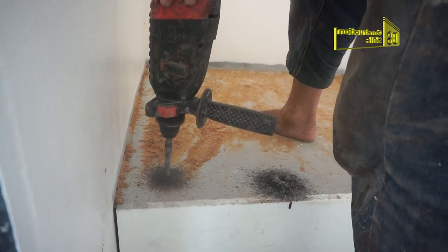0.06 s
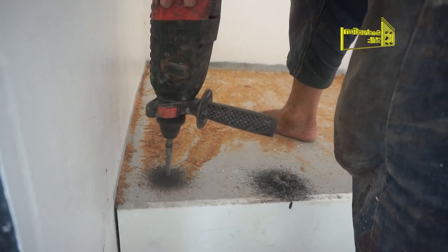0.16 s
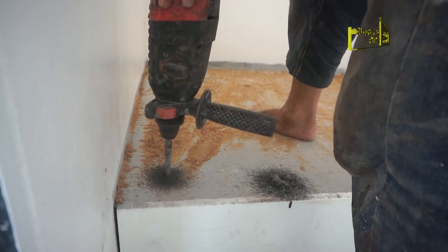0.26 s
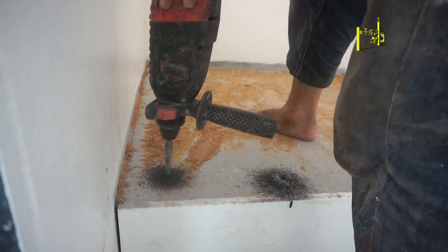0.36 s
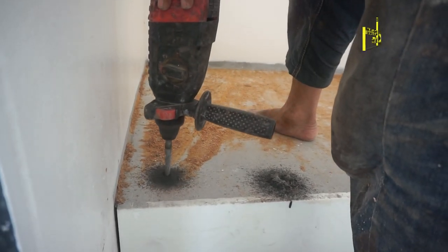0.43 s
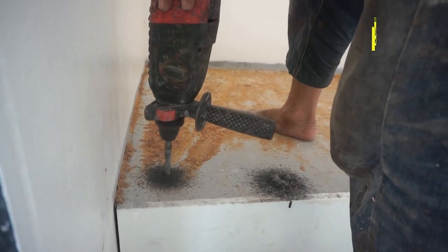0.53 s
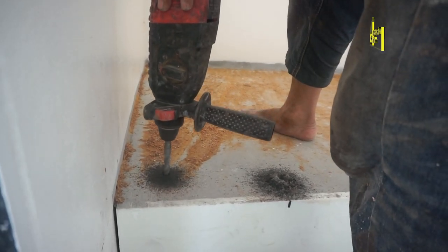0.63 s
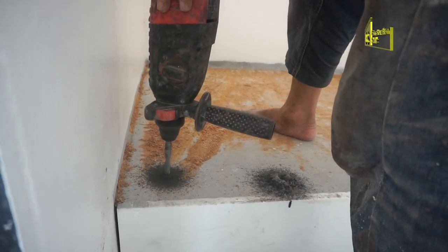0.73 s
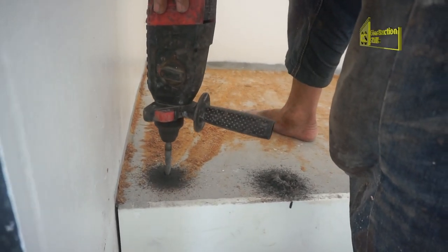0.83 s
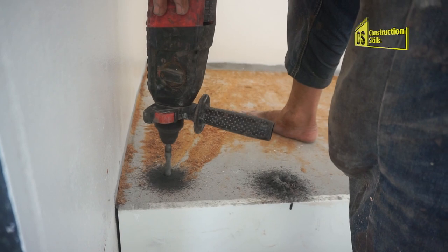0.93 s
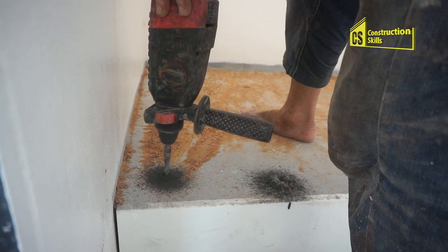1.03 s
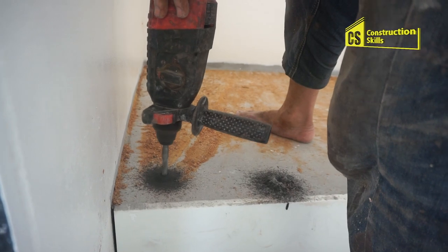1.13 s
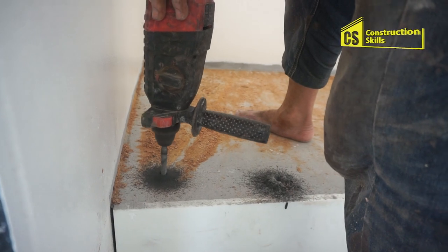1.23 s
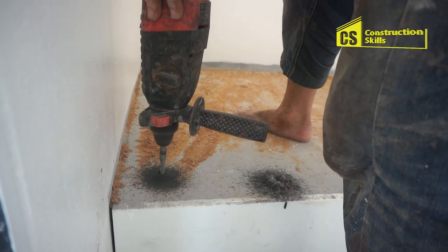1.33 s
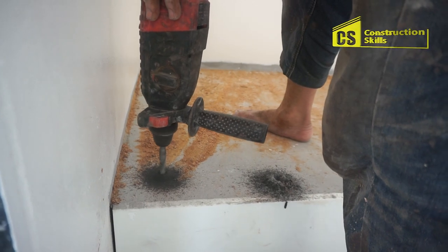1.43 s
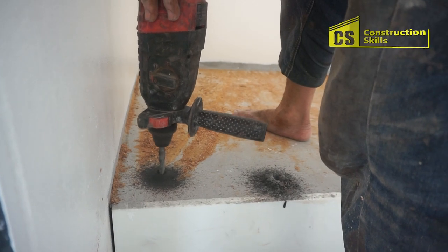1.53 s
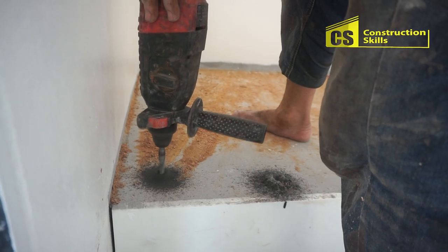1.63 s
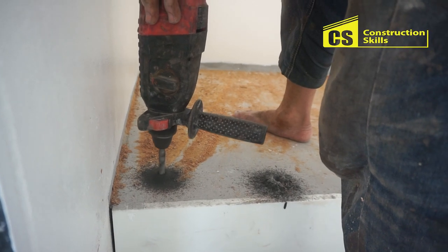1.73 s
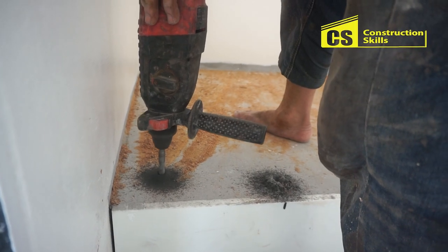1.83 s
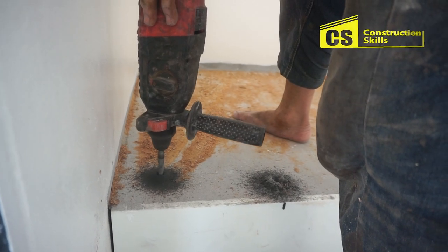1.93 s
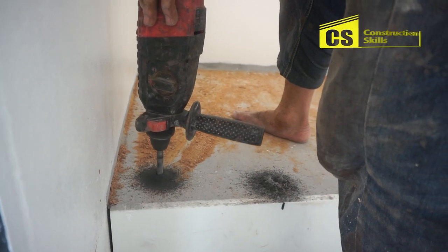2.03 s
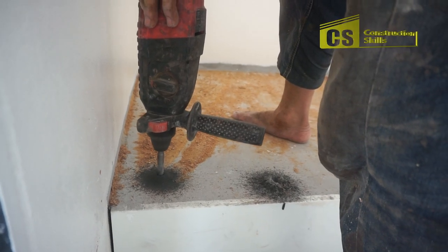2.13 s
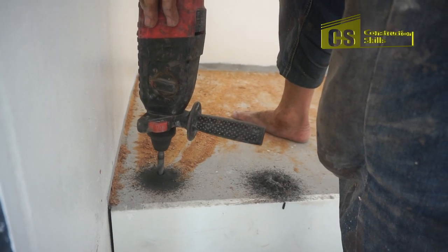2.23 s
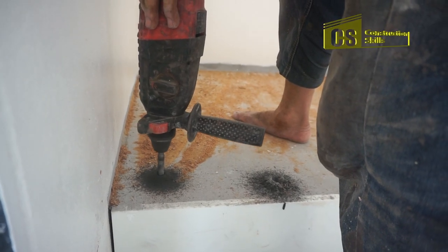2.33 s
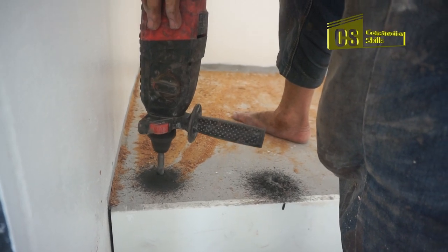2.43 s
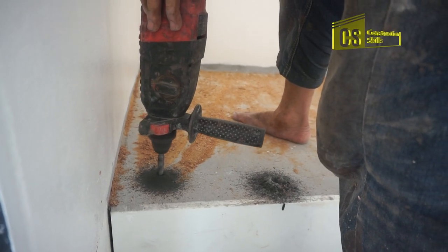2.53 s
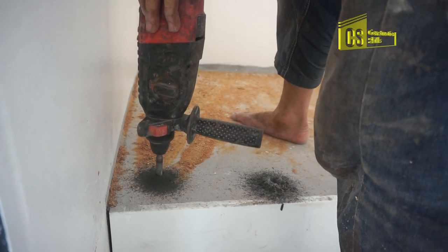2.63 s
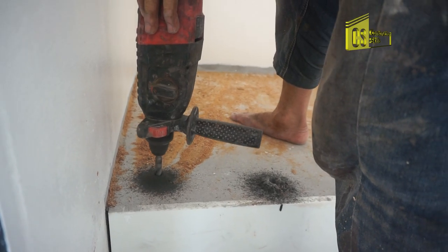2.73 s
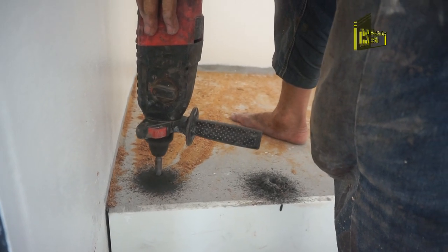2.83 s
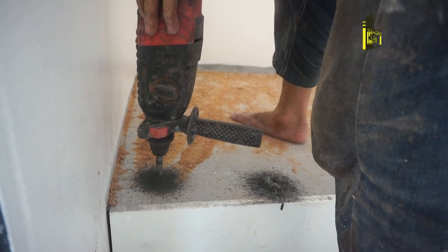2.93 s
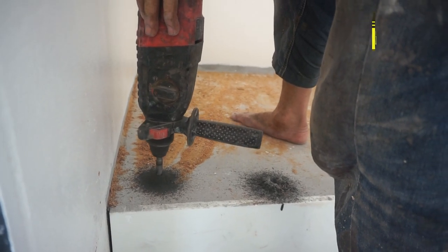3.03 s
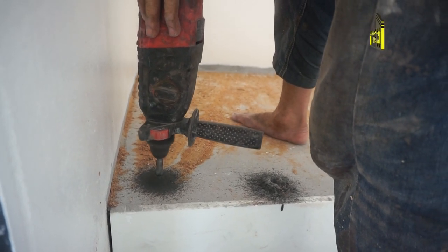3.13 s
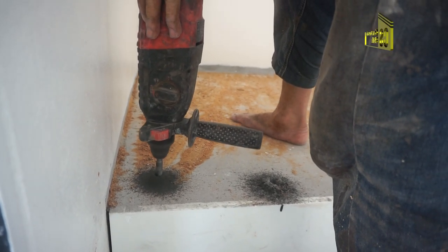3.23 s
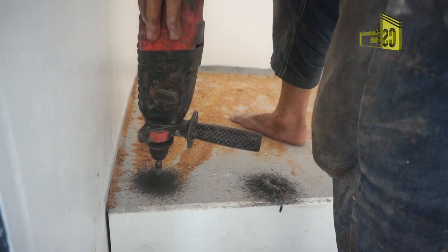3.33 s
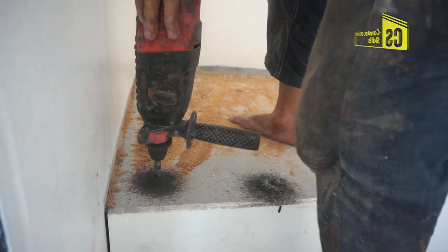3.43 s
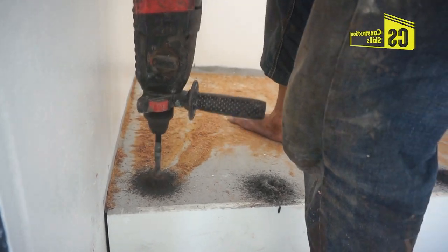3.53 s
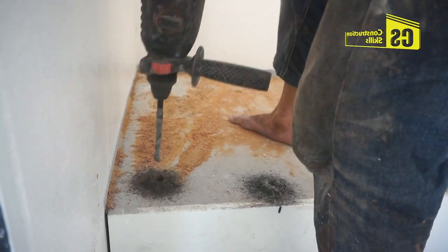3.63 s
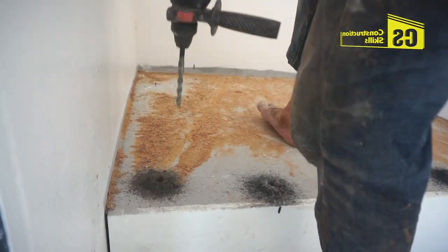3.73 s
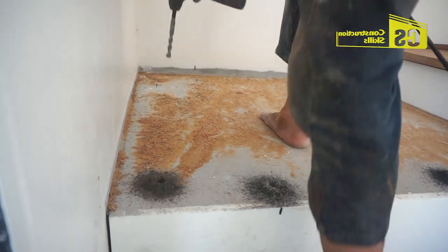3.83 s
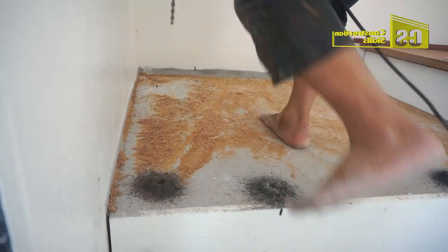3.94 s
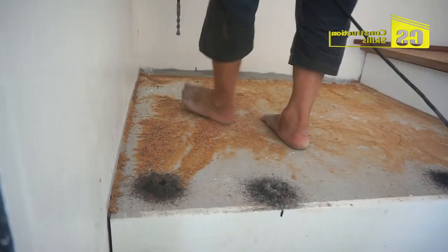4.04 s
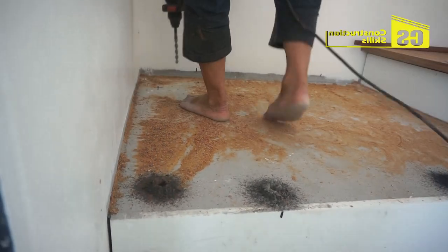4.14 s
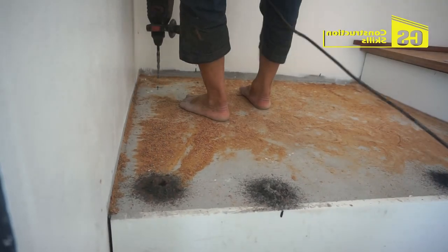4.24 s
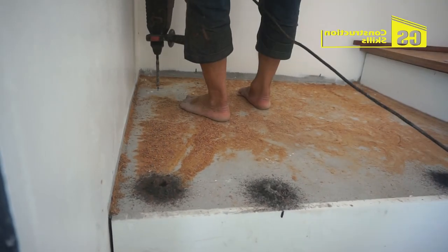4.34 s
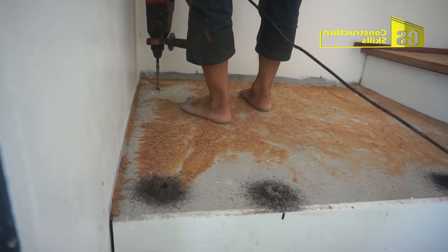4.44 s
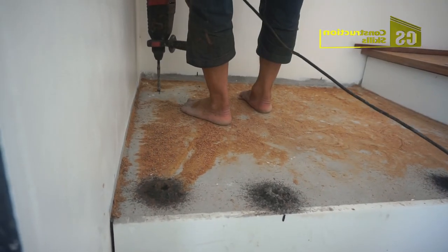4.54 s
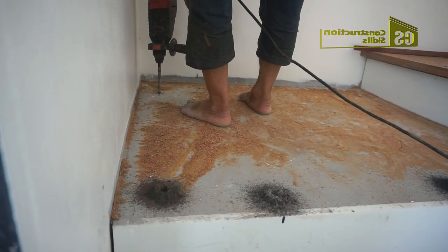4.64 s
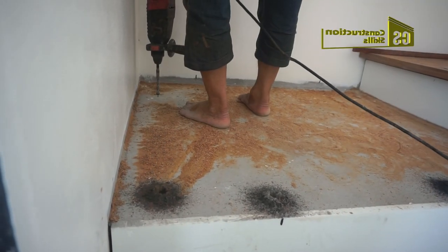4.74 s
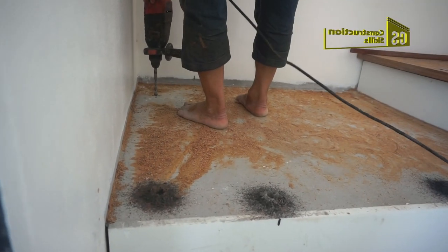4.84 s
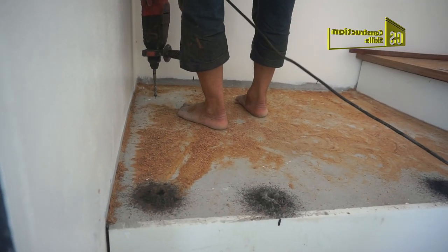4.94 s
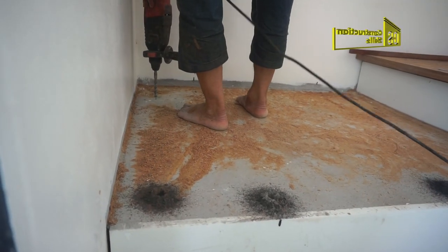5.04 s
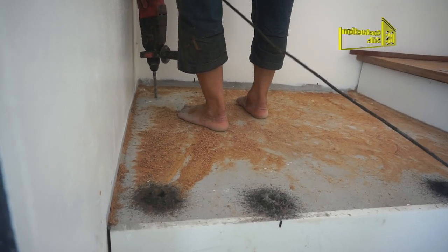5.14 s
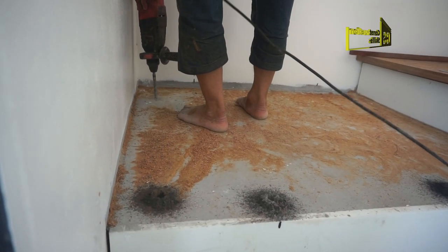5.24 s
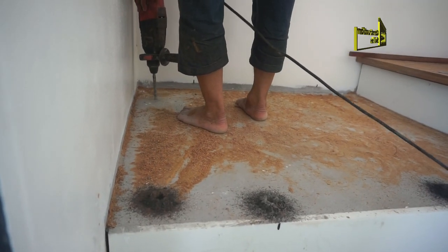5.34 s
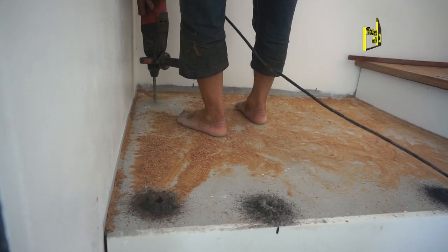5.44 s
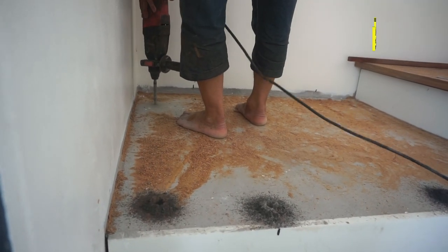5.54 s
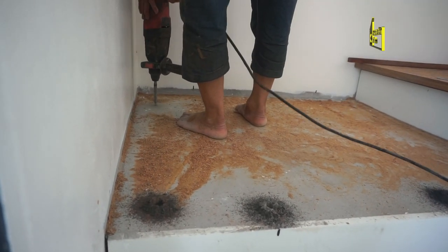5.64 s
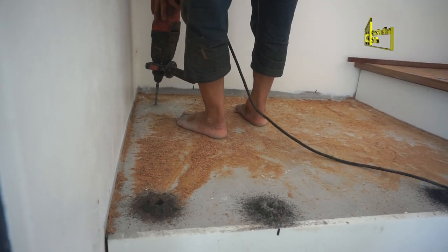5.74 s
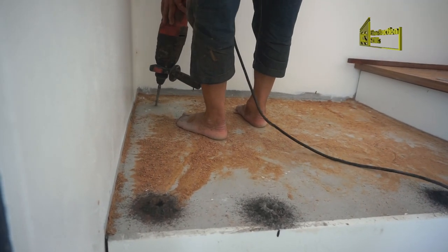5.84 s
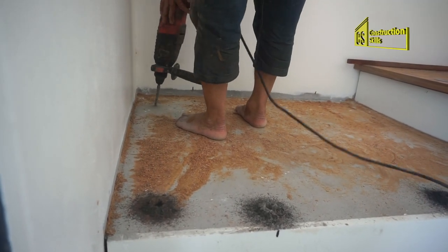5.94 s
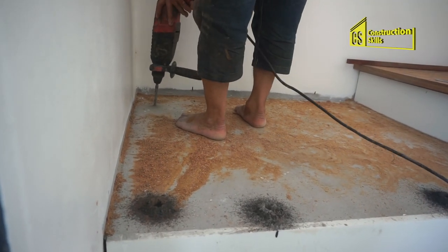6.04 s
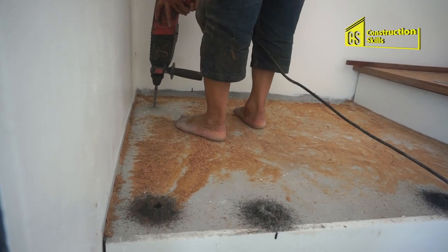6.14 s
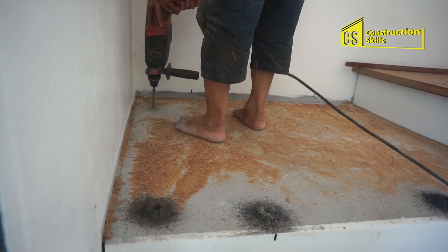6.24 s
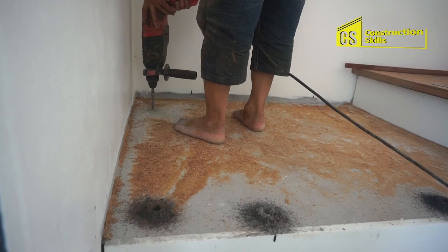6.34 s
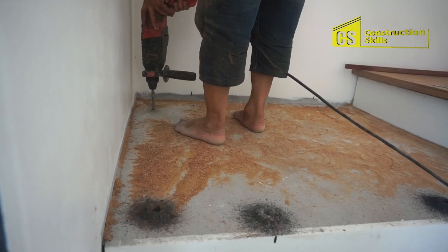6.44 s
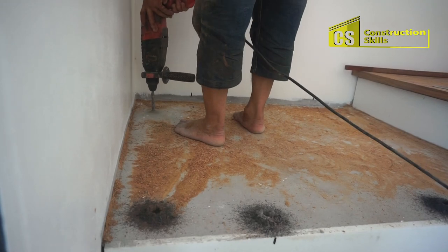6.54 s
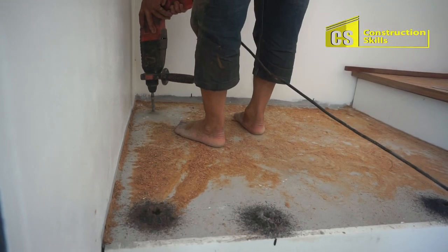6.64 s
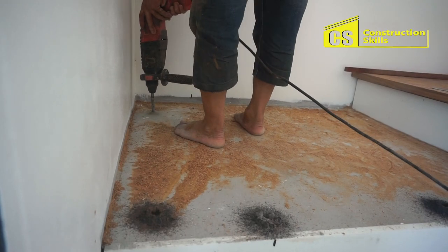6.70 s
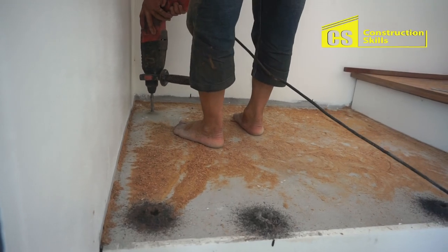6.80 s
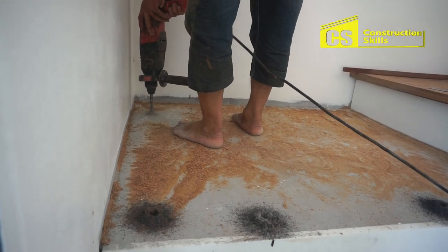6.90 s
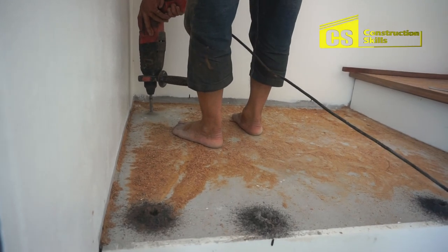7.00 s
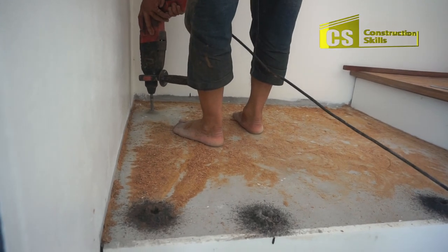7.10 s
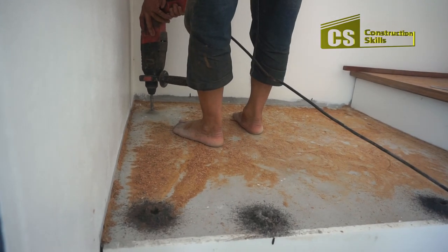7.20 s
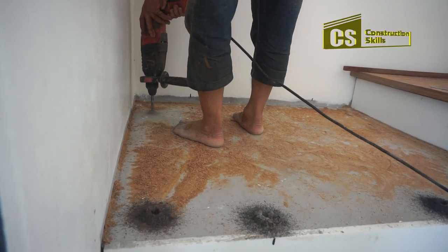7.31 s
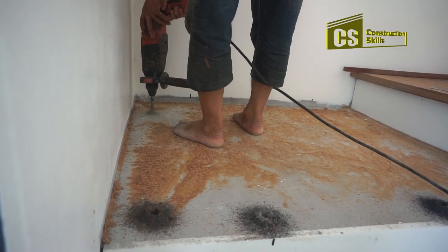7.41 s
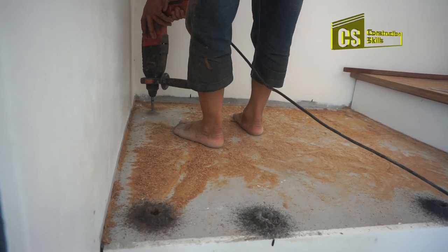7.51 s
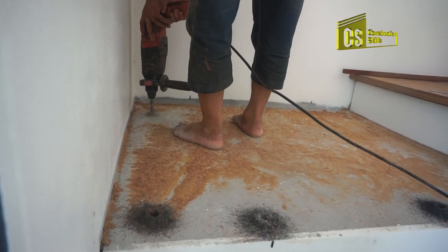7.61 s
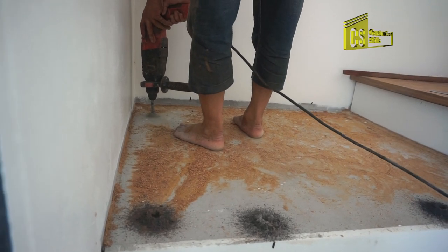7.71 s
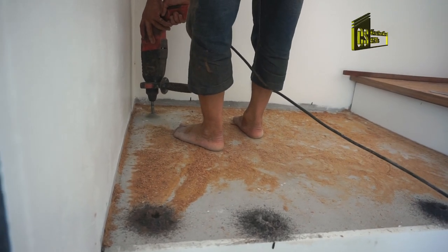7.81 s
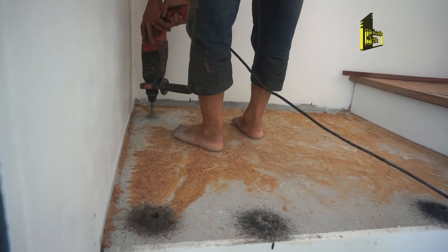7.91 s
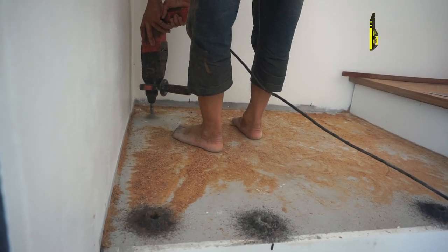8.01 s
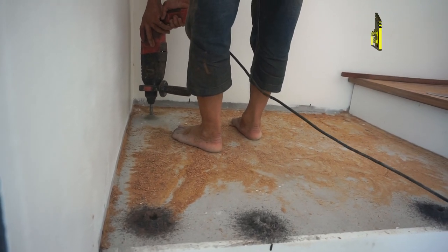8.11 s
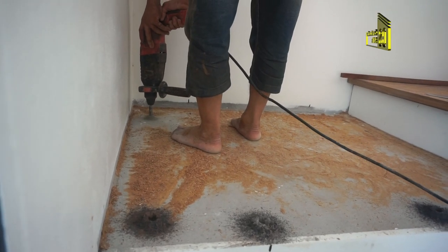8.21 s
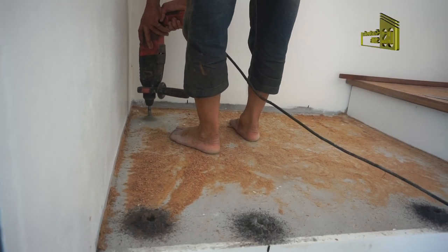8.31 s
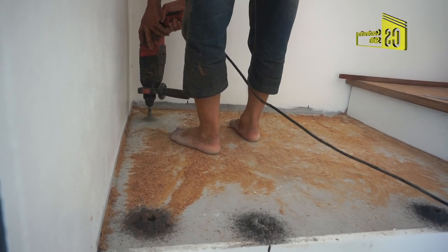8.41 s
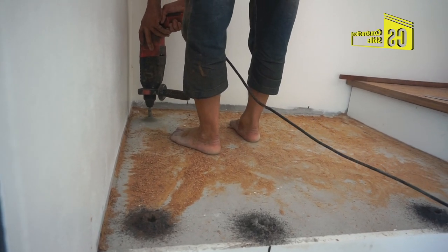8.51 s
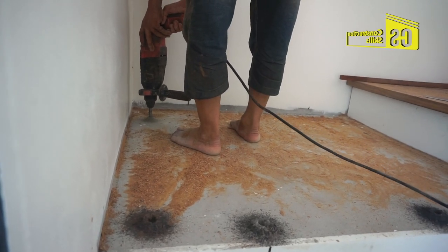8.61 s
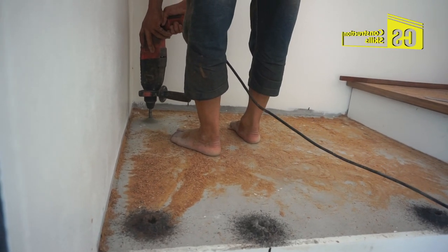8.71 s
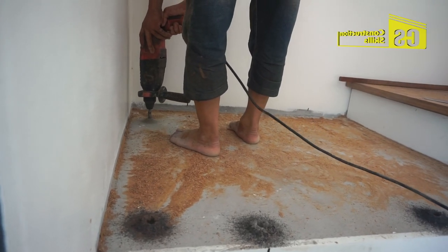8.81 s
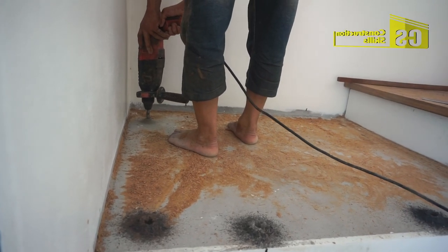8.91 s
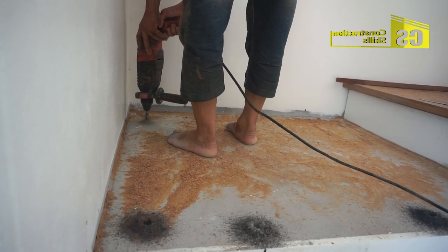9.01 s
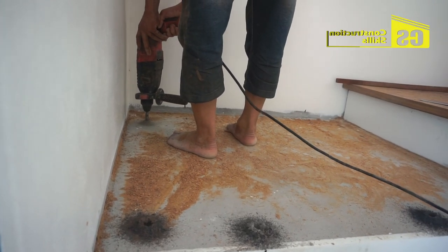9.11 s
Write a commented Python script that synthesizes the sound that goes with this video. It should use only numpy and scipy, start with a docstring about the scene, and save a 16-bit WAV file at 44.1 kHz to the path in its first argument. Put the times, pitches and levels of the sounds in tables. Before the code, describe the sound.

A loud hammer drill runs steadily, its rapid blows fused into a rasping buzz under hissing grit and a shrill whine. The pitch sags as the bit pulls free and the motor stops. In the brief pause come a squealing trigger blip, faint barefoot steps, breathy air and distant slow hammering. Then clanks, and the drill bites again, weaker at first and growing steadier. Heard by phone in a hard stairwell.

```python
"""Rotary hammer in a stairwell

A corded rotary hammer bores two holes in a concrete landing of a bare stairwell, heard through a phone.
Blows buzz in the slab as a stack of overtones and the gears whine at 36 teeth a blow. Noise bursts of grit
pulse with each blow over steady fan hiss. Between the holes the trigger is blipped with a click and short
squeals, feet fall, and a slower, duller hammering swells from further off; bright clanks, rings of narrow
noise, come as the second hole begins. Filtered stairwell air, a breathy falling whistle and a thin rising
strand fill the pause over a low rumble."""
import sys
import numpy as np
from scipy import signal
from scipy.fft import rfft, irfft, next_fast_len
from scipy.io import wavfile
from scipy.ndimage import uniform_filter1d

SR = 44100
rng = np.random.default_rng(int(sys.argv[2]) if len(sys.argv) > 2 else 0)


def transcribe(u):
    """Save the signal u as a 16-bit wav file named by the first command-line argument.

    u: samples, shape (n,) or (channels, n), limited to [-1, 1]; the rate is SR.
    q: integer samples, one column per channel.
    """
    v = np.clip(np.atleast_2d(u).T, -1, 1)
    q = np.round(v * 32767).astype(np.int16)
    wavfile.write(sys.argv[1], SR, q)


N = 403952
T = np.arange(N) / SR  # time, s
M = next_fast_len(N)  # spectrum length, samples
BIN_HZ = np.arange(M // 2 + 1) * SR / M
SECOND_HOLE = T > 4.6  # tone colours switch here, in the pause between the holes


def undb(db):
    """dB to gain."""
    return 10 ** (np.asarray(db) / 20)


def unit(x):
    """Scaled to rms 1."""
    return x / np.sqrt(np.mean(x ** 2))


def ramp(s, length):
    """0 before s, 1 after s + length."""
    return np.clip((T - s) / length, 0, 1)


def curve(*tables, level):
    """Columns of tables over time; the level column falls to -100 dB just outside each table."""
    rows = []
    for table in tables:
        table = np.array(table, float)
        before, after = table[0].copy(), table[-1].copy()
        before[0] -= 0.01
        after[0] += 0.03
        before[level] = after[level] = -100
        rows += [before, table, after]
    s, *columns = np.vstack(rows).T
    return [np.interp(T, s, c) for c in columns]


def walk(rate):
    """Random levels held 1 / rate s and smoothed twice; spread near 1."""
    k = max(int(SR / rate), 1)
    held = np.repeat(rng.standard_normal(4000), k)[:N]
    held = np.resize(held, N)
    return np.sqrt(2) * uniform_filter1d(uniform_filter1d(held, k), k)


def over_hz(points):
    """A (Hz, value) table spread over the spectrum bins, straight between points in log frequency."""
    hz, values = np.transpose(points)
    return np.interp(np.log(np.maximum(BIN_HZ, 1)), np.log(np.maximum(hz, 1)), values)


def colour(x, points):
    """Shaped by a (Hz, dB) spectrum."""
    return irfft(rfft(x, M) * undb(over_hz(points)), M)[..., :N]


def ringing(x, rings):
    """Bell-shaped boosts at the broad resonances."""
    boost_db = sum(db * np.exp(-.5 * ((BIN_HZ - hz) / width * 2) ** 2) for hz, width, db in rings)
    return irfft(rfft(x, M) * undb(boost_db), M)[..., :N]


def split(x, hz, kind):
    """Gentle low- or high-pass."""
    return signal.sosfilt(signal.butter(2, hz, kind, output="sos", fs=SR), x)


def three_bands(x, low_hz, high_hz):
    """Low, middle and high parts that add up to the whole."""
    low, high = split(x, low_hz, "low"), split(x, high_hz, "high")
    return low, x - low - high, high


# how much left and right noise agree: freq_hz, likeness (0-1)
STEREO_LIKENESS = [(60, 0.42), (130, 0.49), (290, .98), (640, 1), (1410, 0.69), (3100, 0.66), (6820, 0.73),
                   (15000, 0.04)]
# balance of the noise: freq_hz, left_minus_right_db
STEREO_TILT = [(60, 0.1), (200, -0.3), (700, 1), (1290, -1.3), (2380, 1.5), (4400, 0.5), (8120, 2.0),
               (15000, 4)]
ECHO_SHARE, ECHO_S = 0.14, 0.000688  # power share of the left-right difference that is a near-wall echo


def pair(gate):
    """Gated noise at both microphones: alike in the upper bass and mids, least alike at the very top."""
    mid, side = (rfft(gate * rng.standard_normal(N), M) for _ in range(2))
    likeness = np.clip(over_hz(STEREO_LIKENESS), 0, 1)
    tilt_db = over_hz(STEREO_TILT) / 2
    echo = mid * np.exp(-2j * np.pi * BIN_HZ * ECHO_S)
    side = np.sqrt(ECHO_SHARE) * echo + np.sqrt(1 - ECHO_SHARE) * side
    mid = mid * np.sqrt((1 + likeness) / 2)
    side = side * np.sqrt((1 - likeness) / 2)
    return irfft([(mid + side) * undb(tilt_db), (mid - side) * undb(-tilt_db)], M)[:, :N]


def tones(cycles, orders_db, wander_db, rate, side, slip=0.51, scatter=1):
    """Overtones of a cycle count; each swells and slips (radians) alone, with a left-right phase lean."""
    out = 0
    for multiple, db in orders_db:
        lean = side * walk(rate / 4)
        start = scatter * rng.random()
        phase = 2 * np.pi * (multiple * cycles + start) + slip * walk(rate) + np.array([lean, -lean])
        out = out + np.sqrt(2) * undb(db + wander_db * walk(rate)) * np.sin(phase)
    return out


# trigger pulls: start_s, release_s, rise_db_per_s, hiss_db (before the bite),
# grind_db (below 3 kHz, re hiss), treble_db (above 9 kHz, re hiss)
TRIGGER_PULLS = [(-1, 3.751, 700, -24.5, 1.5, -2.5), (4, 4.14, 603, -27, -4, -5), (5, 10, 8000, -27, 0, 2)]
# how hard the bit bites, added to the pulls: time_s, hiss_db, grind_db, treble_db
BITE_SHADES = [(0, 0.5, 2.5, 3.5), (.6, 0, 0.5, 1), (.75, 1.5, 2.5, 2.5), (1.35, -0.5, 2.5, 1.5),
               (1.5, 1.5, 1, 0.5), (2.4, -0.5, 0.5, 2.5), (2.6, 0, 1.5, 1.5), (2.9, 0.5, 1.5, 1),
               (3.2, 1.5, 1, 2), (3.45, 1, 3.5, 0), (3.58, 2, 2.5, 4.5), (3.75, -1, -1.5, -1),
               (3.85, -1.5, 2.5, -10), (5.01, -2, -3, -3), (5.06, -3.5, 3, 3.5), (5.15, -6, 8.5, -11),
               (5.22, -8.5, 2, 1), (5.4, -6, 5, 1), (5.6, -6.5, -4, 4.5), (5.86, -2.5, -1.5, -1),
               (6.0, -5, -2, 1.5), (6.6, -2.5, -2.5, 2), (7.27, -0.4, 0.5, 1), (8.27, -2, -0.5, 2),
               (8.33, -1, 3.5, 1), (9.16, -0.5, 5, -2)]
COAST_DB_PER_S, COAST_KNEE_S = 192, 0.016


def trigger():
    """Hiss, grind and treble dB: each pull rises fast, holds and coasts down; the bite shades the holes."""
    start, release, rise, hiss_db, grind_db, treble_db = np.transpose(TRIGGER_PULLS)[:, :, None]
    coast_s = COAST_KNEE_S * np.logaddexp(0, (T - release) / COAST_KNEE_S)
    each_db = hiss_db - rise * np.maximum(start - T, 0) - COAST_DB_PER_S * coast_s
    now = np.argmax(each_db, axis=0)
    s, *shades = np.transpose(BITE_SHADES)
    bite = [(now != 1) * np.interp(T, s, c) for c in shades]  # the blip spins free
    return np.max(each_db, axis=0) + bite[0], grind_db[now, 0] + bite[1], treble_db[now, 0] + bite[2]


# gear mesh speed before the wobble, the first hole ending in a snag as the bit is pulled out: time_s, mesh_hz
FIRST_HOLE_MESH = [(0, 6070), (.33, 6057), (.44, 5930), (.51, 6070), (.59, 5975), (.68, 6107), (1.16, 6056),
                   (1.29, 5950), (1.53, 5940), (1.61, 5910), (1.79, 5876), (1.94, 5934), (1.99, 5826),
                   (2.07, 5940), (2.17, 5800), (2.27, 5950), (2.38, 5870), (2.49, 5945), (2.7, 5985),
                   (2.85, 5926), (3.46, 5995), (3.49, 5890), (3.52, 4993), (3.55, 4680), (3.58, 4700),
                   (3.645, 5090), (3.68, 4380), (3.72, 4086)]
# spin-up for the second hole: time_s, mesh_hz
SPIN_UP_MESH = [(5.36, 5570), (5.4, 5970), (5.44, 6236)]
# blow rate once the second hole is up to speed: time_s, blows_per_s
SECOND_HOLE_BLOWS = [(5.52, 173.1), (5.74, 171.4), (5.81, 172.6), (6.11, 170), (6.5, 167), (6.67, 166.4),
                     (6.73, 167.2), (7.02, 167.5), (7.08, 166.1), (7.16, 167.8), (7.35, 167.9), (7.41, 167),
                     (7.51, 167.8), (7.61, 166.9), (7.69, 168.5), (7.85, 167.2), (8.31, 168.4),
                     (8.38, 166.5), (8.49, 168.7), (8.57, 168.9), (8.6, 171.2), (8.69, 170.0)]
# last of the second hole: time_s, mesh_hz
LAST_MESH = [(9.0, 6127), (9.16, 6060)]
TEETH, PINION = 36, 7  # teeth passing per blow; teeth on the armature's pinion
BLIP_MESH_HZ = 3694  # the blip never reaches working speed
SPEED_WOBBLE, WOBBLE_PER_S = .0015, 25  # share of speed, changes per s


def blow_count():
    """Running count of blows from the mesh speed; the load shakes it, which blurs the highest tones most."""
    blip = [(s, BLIP_MESH_HZ) for s in TRIGGER_PULLS[1][:2]]
    second = np.multiply(SECOND_HOLE_BLOWS, [1, TEETH])
    speed = np.vstack([FIRST_HOLE_MESH, blip, SPIN_UP_MESH, second, LAST_MESH])
    mesh_hz = np.interp(T, *speed.T) * (1 + SPEED_WOBBLE * walk(WOBBLE_PER_S))
    return np.cumsum(mesh_hz) / TEETH / SR


# noise spectrum, one list per hole: freq_hz, relative_db
GRIT_COLOUR = [
    [(88, -89), (150, -55), (457, -46), (979, -25), (1120, -26.5), (1310, -16.5), (1830, -4.5),
     (2310, -7.5), (3420, -6), (5570, -3.5), (6020, -2), (6910, -5.5), (9260, -8.5), (13400, -7.5),
     (16000, -13)],
    [(88, -86), (150, -64), (774, -29), (837, -17.5), (923, -19.5), (979, -19.5), (1080, -15.5),
     (1420, -9.5), (1830, -3), (2920, -3.5), (3350, -7), (6140, -1.5), (8070, -4), (14000, -9.5),
     (16000, -11)],
]
# broad rings of bit and housing, one list per hole: centre_hz, width_hz, boost_db
HOUSING_RINGS = [
    [(1890, 220, 1.5), (6460, 1400, -0.5), (9230, 950, 6)],
    [(2260, 1060, 2.5), (4840, 500, 2.5), (6890, 500, 5), (10070, 960, 4)],
]
# steady noise beside the bursts, one per trigger pull: share (gain)
STEADY_GAIN = [0.21, 0.41, 0.39]
CHIP_DB, CHIP_SCATTER_DB = -1.5, 3.5  # level before the noise is coloured, and spread
CHIP_LENGTH, CHIP_LOW_HZ = 0.17, 2470  # decay in blows, high-pass


def hiss(blows):
    """Each blow throws a rounded grit burst and a sharp stone chip, sized apart, over fan and brush noise."""
    hiss_db, grind_db, treble_db = trigger()
    blow, since_blow = blows.astype(int), blows % 1

    burst_size = undb(1.6 * rng.standard_normal(2000))[blow]
    burst = burst_size * np.exp(-since_blow / 0.53)
    burst = uniform_filter1d(uniform_filter1d(burst, size=120), size=90)
    steady = np.select([T < 3.9, T < 4.6], STEADY_GAIN[:2], STEADY_GAIN[2])
    flutter = undb(0.38 * walk(6) + 0.65 * walk(18))

    chip_size = undb(CHIP_DB + CHIP_SCATTER_DB * np.tanh(rng.standard_normal(2000)))[blow]
    chip = chip_size * np.exp(-since_blow / CHIP_LENGTH)
    chips = split(pair(uniform_filter1d(chip, size=30)), CHIP_LOW_HZ, "high")

    noise = pair((steady + burst) * flutter) + chips
    first, second = (colour(noise, c) for c in GRIT_COLOUR)
    first = unit(ringing(first, HOUSING_RINGS[0]))
    sunk = ramp(5.9, 0.69)  # the second hole starts to ring once the bit is gripped
    second = sunk * unit(ringing(second, HOUSING_RINGS[1])) + (1 - sunk) * unit(second)
    full = np.where(SECOND_HOLE, second * undb([[-.3], [.3]]), first)
    low, mid, high = three_bands(full, 3000, 9000)
    return (mid + low * undb(grind_db) + high * undb(treble_db)) * undb(hiss_db)


# strength of the blows before the flutter, one list per hole: time_s, level_db
BUZZ_LEVEL = [
    [(0, -55), (.1, -55), (1.8, -55.5), (3.47, -54)],
    [(5.38, -68), (5.5, -59), (6.3, -54), (7.1, -52), (8.3, -53), (9.16, -52.5)],
]
# overtones of the blow rate, in dB re buzz: multiple, first_hole_db, then in the second hole
# skating_db, gripping_db, leaning_db, full_weight_db, easing_off_db
SLAB_OVERTONES = [(3, -30, -24, -32, -37, -38, -21), (4.01, -18, -15.5, -22, -27, -25, -13.5),
                  (5.027, -9, 0.5, -6.5, -13.5, -10, -6.5), (6.007, -5.5, -7, -3, 3.5, 3.5, -1.5),
                  (7, -9, 3, -3, -7, -4, 2), (7.965, 3.5, 3, 2, 4.5, 5, 3), (9, 4.5, 3, -5, 2, 5, -10),
                  (9.99, 11, -13, 0, -19, -5, 8), (10.993, 14, 13.5, 9.5, 12.5, 16, 10.5),
                  (11.98, 8.5, 2, 5, 6.5, 12, -8), (13.05, 5, 3, 9.5, 6.5, 7.5, 9.5),
                  (14.05, 5, 6.5, 6, 1, -3, 4), (15, 4, -12, -5, 5, 6.5, 2), (16, 4.5, 11, 7, -14, -17, -7),
                  (16.99, -3, 9, -8, 14.5, 13, -1), (18, 1, -13, -18, -8, -9, -13),
                  (19, 5, -10, -8, -5, 1.5, 0), (20.1, -2, -10, -5, -9, -1, -3),
                  (21.83, 5, -6, -6, -6, -0.5, -4), (23.03, 3, -6, -6, -9, -2, -8),
                  (25.95, 4.5, -7, -3, -2, -2, 2), (26.8, 9, -4, -4, 1, 4.5, -3)]
# when the second hole starts to grip, lean, take full weight and ease off: start_s
WEIGHT_STAGES = [5.98, 6.3, 7.02, 8.36]
STAGE_RAMP_S = 0.16


def buzz(blows):
    """Regular blows through the slab: an overtone stack whose balance shifts with the weight on the drill."""
    flutter_db = np.where(SECOND_HOLE, 1.8, .7) * walk(22)  # the whole stack moves together
    db = curve(*BUZZ_LEVEL, level=1)[0] + flutter_db
    steps = np.array([ramp(s, STAGE_RAMP_S) for s in WEIGHT_STAGES])
    stack = []
    for multiple, first_db, *stages_db in SLAB_OVERTONES:
        second_db = stages_db[0] + np.diff(stages_db) @ steps
        stack.append((multiple, db + np.where(SECOND_HOLE, second_db, first_db)))
    # small scatter: overtones of one blow start nearly in step
    return tones(blows, stack, wander_db=1.6, rate=24, side=0.2, slip=.25, scatter=.08)


# whine before its flicker and stereo lean, one list per hole: time_s, level_db
WHINE_CURVES = [
    [(0, -29.5), (.55, -31), (.75, -27), (1.2, -30.5), (2.2, -32), (2.55, -29.5), (2.75, -30.5),
     (3.3, -29.5), (3.5, -30.5), (3.64, -32), (3.67, -42), (3.72, -43)],
    [(5.36, -43), (5.53, -36.5), (5.84, -33.5), (5.94, -46), (6.03, -32.5), (6.1, -47), (6.16, -35),
     (6.21, -41), (6.27, -35), (6.35, -41.5), (6.43, -40), (6.5, -39), (6.8, -43), (6.9, -42), (7.0, -48),
     (7.1, -33), (7.4, -34), (7.85, -42), (8.04, -36), (8.35, -43.5), (8.54, -42.5), (8.7, -48),
     (9.05, -40), (9.16, -45)],
]
# sidebands and octave of the mesh: multiple (of the blow rate)
SIDEBAND_MULTIPLES = [29, 30, 31, 32, 33, 34, 35, 37, 38, 40, 71, 72]
# their levels re the capped whine, which is raised 6 dB before the cap in the second hole:
# first_hole_db, second_hole_db
SIDEBAND_LEVELS = [(-15, -20), (-14, -15.5), (-15, -15.5), (-28, -25), (-12.5, -31), (-22, -32), (-19, -13),
                   (-7, -14), (-26, -14.5), (-15.5, -13), (-22, -20), (-15.5, -13)]
# motor tones, same reference: multiple (of the armature's turns), first_hole_db, second_hole_db
ARMATURE_TONES = [(6, -19, -12.5), (8, -26, -25), (12, -14.5, -13), (16, -30, -14)]
# side and motor tones stop following the whine above this, one per hole: cap_db
SIDE_CAPS = [-30.5, -34]
WHINE_FLICKER_DB = 1.5


def gears(blows):
    """The tooth mesh sings with sidebands whole blows apart; the armature adds its own tones."""
    whine_db = curve(*WHINE_CURVES, level=1)[0] + WHINE_FLICKER_DB * walk(12)
    first_ref_db = np.minimum(whine_db, SIDE_CAPS[0])
    second_ref_db = np.minimum(whine_db + 6, SIDE_CAPS[1])
    # in the second hole the lowest sidebands wait for grip and weight, the highest tones for the grip only
    before_grip, before_weight = 1 - ramp(6.1, .3), 1 - ramp(6.3, .4)
    sides = []
    for k, (first_db, second_db) in zip(SIDEBAND_MULTIPLES, SIDEBAND_LEVELS):
        sides.append((k, first_db, second_db - 12 * (k < 32) * before_weight))
    motor = [(k * TEETH / PINION, first_db, second_db) for k, first_db, second_db in ARMATURE_TONES]

    lines = [(TEETH, whine_db)]
    for k, first_db, second_db in sides + motor:
        wait_db = 6 * ((k > 60) | (k < 32)) * before_grip
        lines.append((k, np.where(SECOND_HOLE, second_ref_db + second_db - wait_db, first_ref_db + first_db)))
    blows_per_s = np.gradient(blows) * SR
    slip = .5 + np.abs(np.log(blows_per_s / 167)) * 5  # the teeth chatter off the working speed
    return tones(blows, lines, slip=slip, wander_db=2.0, rate=70, side=0.25) * undb([[1.1], [-1.1]])


# squeals of the free-spinning blip: start_s, from_hz, to_hz, length_s, peak_db (before the stereo lean)
BLIP_SQUEALS = [(3.952, 5900, 6100, 0.016, -49), (3.97, 7000, 7060, .015, -33),
                (3.991, 6750, 7350, 0.025, -25), (4.013, 5920, 5900, .02, -25),
                (4.03, 6000, 6500, .015, -28), (4.043, 4670, 4750, .012, -28),
                (4.045, 7500, 8000, .015, -31), (4.095, 7200, 7200, 0.031, -30),
                (4.123, 6200, 5800, .02, -30), (4.135, 5500, 5310, .012, -28)]


def squeals():
    """Short gliding tones, slightly rough in phase and a little louder on the left."""
    out = np.zeros(N)
    for s, from_hz, to_hz, length, db in BLIP_SQUEALS:
        u = (T - s) / length
        hz = from_hz + (to_hz - from_hz) * np.clip(u, 0, 1)
        swell = np.exp(-8 * (u - .5) ** 2)
        out += undb(db) * swell * np.sin(2 * np.pi * np.cumsum(hz) / SR + 1.28 * walk(500))
    return out * undb([[1], [-1]])


def knocks(events, t60, rise_s, width_hz, crack_db):
    """Short rings of narrow noise with a broad crack at the top."""
    out, t = np.zeros((2, N)), T[:SR // 4]
    k = max(int(SR / width_hz), 1)
    for s, db, hz in events:
        a, b, c = rng.standard_normal((3, len(t)))
        a, b = (uniform_filter1d(uniform_filter1d(v, k), k) for v in (a, b))
        ring = unit(a * np.sin(2 * np.pi * hz * t) + b * np.cos(2 * np.pi * hz * t))
        crack = undb(crack_db) * np.diff(c, prepend=0) * np.exp(-t / 0.0021)
        hit = ring * 1000 ** (-t / t60) + crack
        start = int(s * SR)
        out[:, start:start + len(t)] += undb(db) * hit * (1 - np.exp(-t / rise_s))
    return split(out, 690, "high")


# the click as the trigger blip starts, then bright clanks as the second hole begins:
# start_s, level_db (before rise, decay and high-pass), ring_hz
CLICK_AND_CLANKS = [(3.992, -22, 6840), (4.915, -37, 2620), (4.92, -38, 6400), (4.96, -50, 8400),
                    (5.005, -30, 6240), (5.0095, -24, 7580), (5.0207, -17, 6700), (5.064, -26, 6650),
                    (5.0924, -24, 6550), (5.1034, -42, 5870), (5.169, -21.5, 6430), (5.181, -25, 6880)]


def click_and_clanks():
    """A click and a run of clanks: bright rings that die within hundredths of a second."""
    return knocks(CLICK_AND_CLANKS, t60=0.018, rise_s=0.00079, width_hz=940, crack_db=-4)


# slow hammering: time_s, level_db
FAR_SWELL = [(3.55, -73), (3.8, -74), (3.97, -66), (4.03, -69), (4.11, -72), (4.18, -63), (4.45, -60),
             (4.72, -51.5), (4.85, -45), (5.012, -45), (5.045, -76), (5.11, -74), (5.155, -61), (5.19, -75)]
# its speed: time_s, blows_per_s
FAR_SPEED = [(3.6, 56.5), (3.85, 56.4), (4.0, 58.4), (4.2, 59), (4.45, 58), (4.75, 57.9), (4.9, 56.7),
             (5.25, 56.3)]
# its overtones before the dulling: multiple (of its blow rate), level_db (re the swell)
FAR_OVERTONES = [(4, -15.5), (5, -13.5), (6, -16), (7, -7), (8, -11), (9, -31), (10, -15), (11, -5.5),
                 (12, -8), (13, -9), (14, -8.5), (15, -8.5), (16, -5), (17, -8.5), (18, -1), (19, -25),
                 (20, -22)]


def far_hammer():
    """Slow blows through the building: clean low overtones and a rattle once a blow."""
    db, = curve(FAR_SWELL, level=1)
    blows = np.cumsum(np.interp(T, *np.transpose(FAR_SPEED))) / SR
    dull_db = np.clip((4.55 - T) / 0.55, 0, 1)  # per overtone: at first only the low ones get through
    deep_db = 5 * ramp(4.82, .1) - 5  # the deepest overtones come in last
    orders = [(k, own_db - max(k - 7, 0) * dull_db + (k < 6) * deep_db) for k, own_db in FAR_OVERTONES]
    stack = tones(blows, orders, wander_db=2.5, rate=24, side=0.15, slip=0.46)
    rattle_colour = [(40, -32), (150, -32), (200, -42), (400, -16), (900, -2), (1400, -1.5), (2500, -28.0)]
    rattle = colour(pair(0.6 + np.exp(-(blows % 1) / 0.24)), rattle_colour)
    return undb(db) * (stack + undb(-0.5) * unit(rattle))


# bare footfalls: start_s, level_db (before rise, decay and high-pass), ring_hz
FOOTFALLS = [(4.149, -44.5, 1196), (4.312, -42.5, 788), (4.335, -46, 1320), (4.347, -41, 750),
             (4.392, -42.5, 756), (5.149, -52, 1240)]


def footsteps():
    """Footfalls: soft-edged, lower rings with almost no crack."""
    return knocks(FOOTFALLS, t60=0.25, rise_s=0.011, width_hz=440, crack_db=-40)


# stairwell air before its high-pass, rows below 3 kHz, 3-6 kHz, above 6 kHz: tail_db, stillest_db, fullest_db
AIR_BANDS = [(-49, -70.5, -43), (-53, -65.5, -43), (-63, -61, -44.5)]
# air spectrum: freq_hz, relative_db
AIR_SPECTRUM = [(900, -38), (1300, -28), (1900, -6), (2400, -3.5), (3200, -10.5), (5000, -3), (6500, 0),
                (8200, 1), (9800, -5), (11000, -18), (16000, -32)]
# narrow resonances in the air: centre_hz, width_hz, boost_db
AIR_STRANDS = [(2416, 100, 1), (8200, 400, 4.5), (10010, 300, 6)]
# a faint, breathy whistle that falls: time_s, pitch_hz, level_db
FALLING_WHISTLE = [(4.61, 4900, -76), (4.64, 5000, -70), (4.7, 4950, -68), (4.77, 4700, -65),
                   (4.84, 4280, -59), (4.9, 4200, -66)]
# a rough rising strand: time_s, pitch_hz, level_db
RISING_STRAND = [(4.66, 2310, -69), (4.75, 2373, -57), (4.83, 2400, -53.5), (4.9, 2465, -50),
                 (5.0, 2490, -54.5)]
# the air dies away after the blip, then swells until the drill restarts
AIR_TAIL_S, AIR_STILL_S, AIR_FULL_S, AIR_END_S = 4.24, 4.54, 4.874, 5.0


def air():
    """Stairwell air as coloured noise, a whistle with its octave and a thin strand between the holes."""
    wind = ringing(colour(pair(undb(1.6 * walk(30))), AIR_SPECTRUM), AIR_STRANDS)
    swelling = 0
    for (tail, still, full), band in zip(AIR_BANDS, three_bands(wind, 3000, 6000)):
        points = [(AIR_TAIL_S, tail), (AIR_STILL_S, still), (AIR_FULL_S, full), (AIR_END_S, full)]
        swelling = swelling + undb(curve(points, level=1)[0]) * unit(band)

    hz, whistle_db = curve(FALLING_WHISTLE, level=2)
    octave_db = whistle_db - 60 * np.maximum(T - 4.7, 0)  # the octave dies first
    whistle = tones(np.cumsum(hz) / SR, [(1, whistle_db), (2, octave_db)],
                    wander_db=4.0, rate=200, side=.6, slip=1.7)
    hz, strand_db = curve(RISING_STRAND, level=2)
    strand = tones(np.cumsum(hz) / SR, [(1, strand_db)], wander_db=4.0, rate=90, side=.4, slip=1.3)
    return split(swelling, 900, "high") + whistle + strand


def floor():
    """A faint low rumble that flickers and sinks in the pauses of the drill."""
    drill_db = np.maximum(trigger()[0], -60)
    noise = 0.77 * rng.standard_normal((2, N)) + rng.standard_normal(N)  # partly shared left and right
    rumble = unit(colour(noise, [(20, -3.5), (150, -5), (400, -4.5), (800, -36)]))
    return rumble * undb(-78.5 + 0.17 * drill_db + 1.7 * walk(5))


def scene():
    """One blow count drives the hiss, buzz and gears; the other sources are laid beside them."""
    blows = blow_count()
    drill = hiss(blows) + buzz(blows) + gears(blows) + squeals()
    return drill + click_and_clanks() + far_hammer() + footsteps() + air() + floor()


def record(dry):
    """The phone cuts the top with a steep low-pass at 15720 Hz."""
    return signal.sosfilt(signal.ellip(10, .2, 70, 15720, fs=SR, output="sos"), dry)


dry = scene()
out = record(dry)
transcribe(out)
```